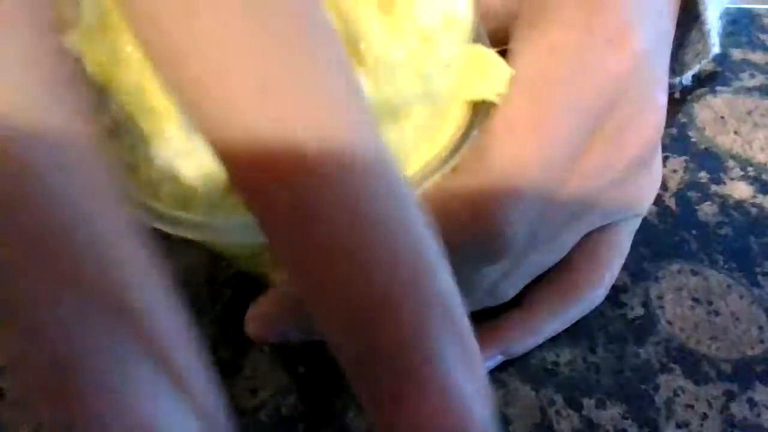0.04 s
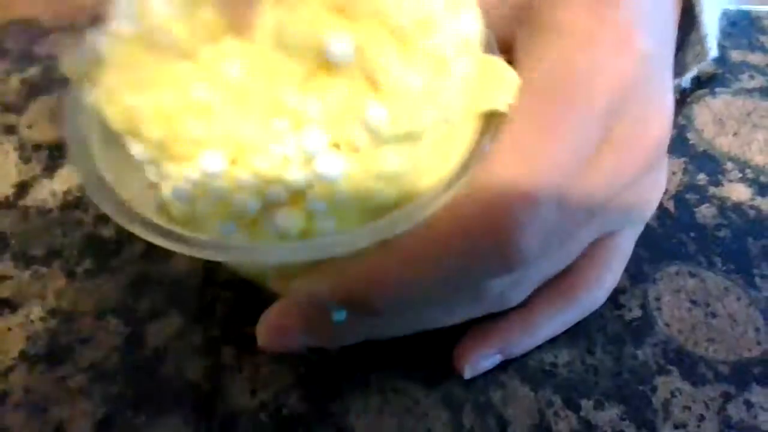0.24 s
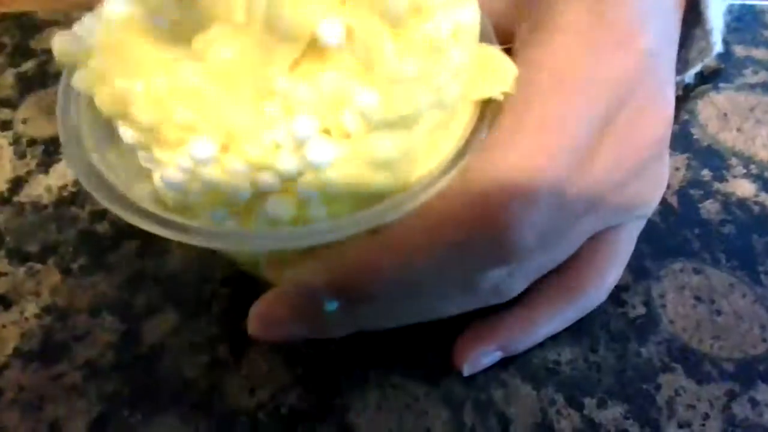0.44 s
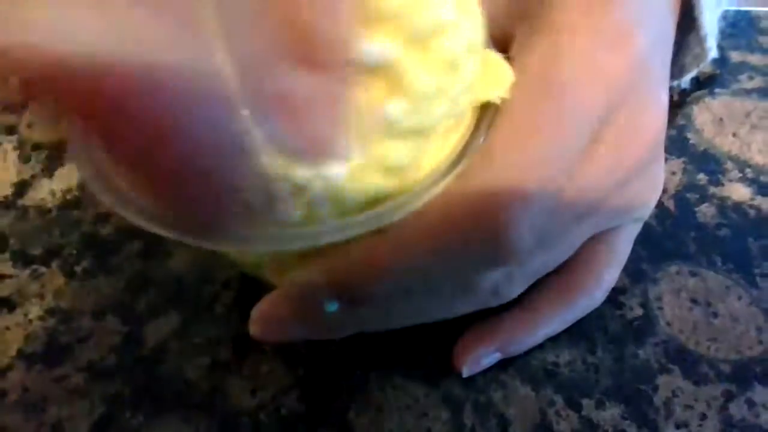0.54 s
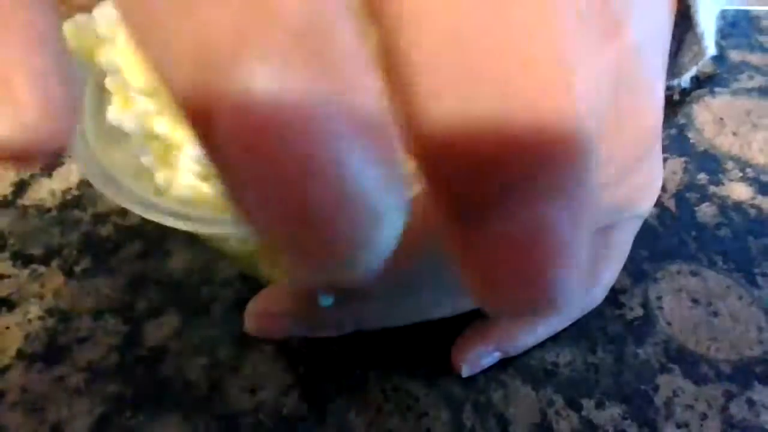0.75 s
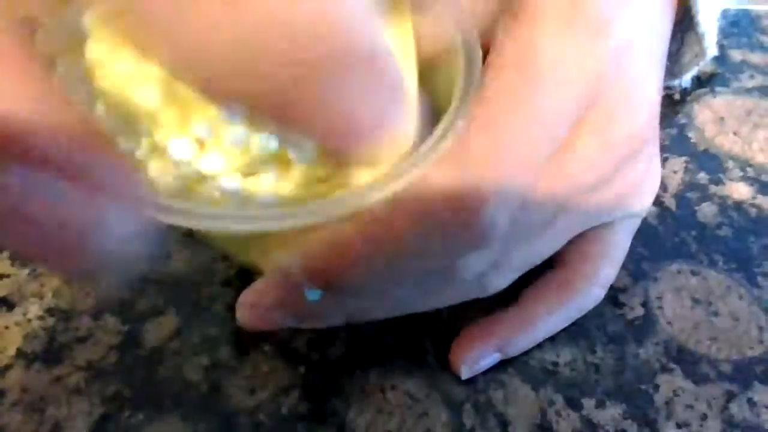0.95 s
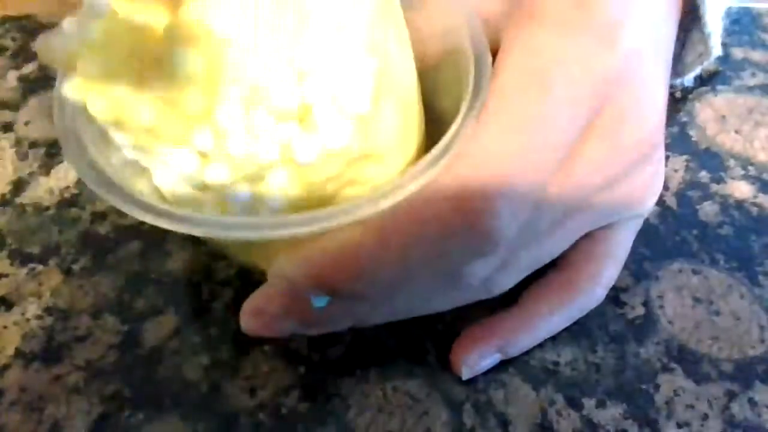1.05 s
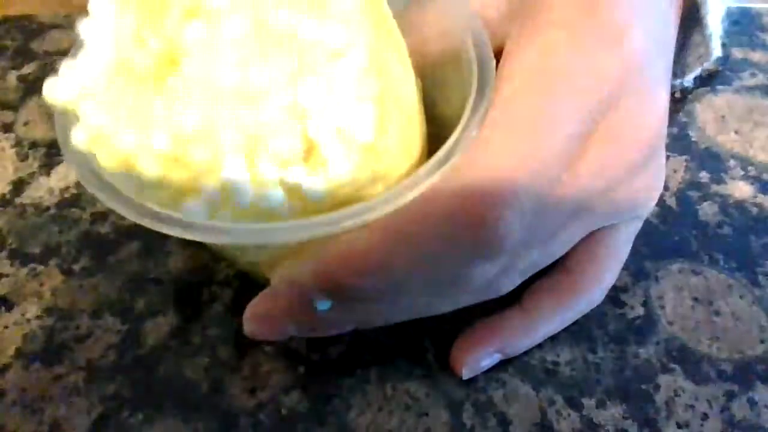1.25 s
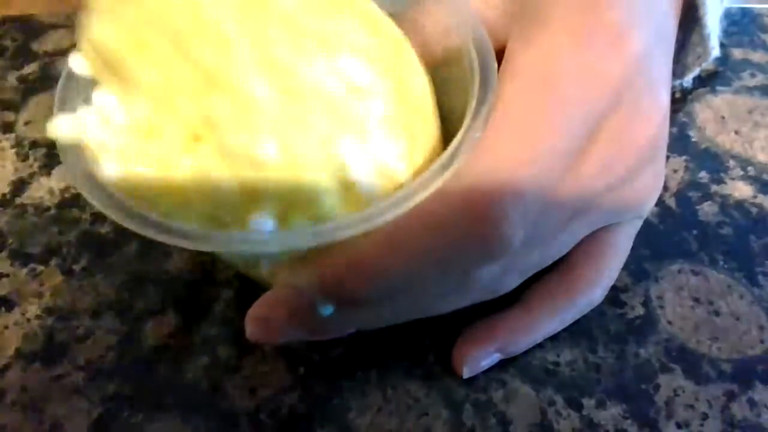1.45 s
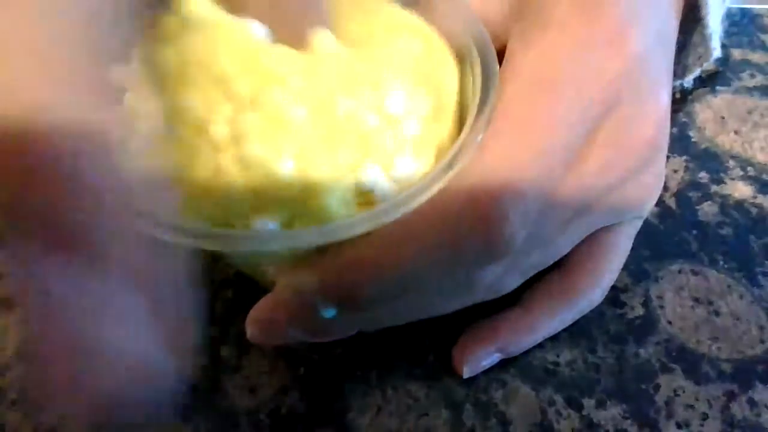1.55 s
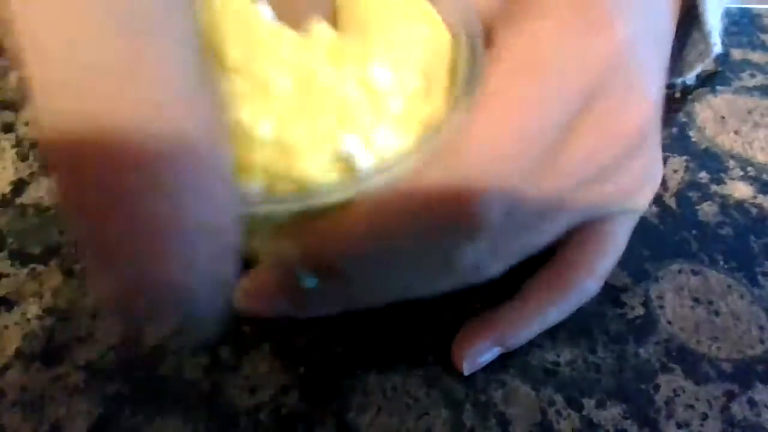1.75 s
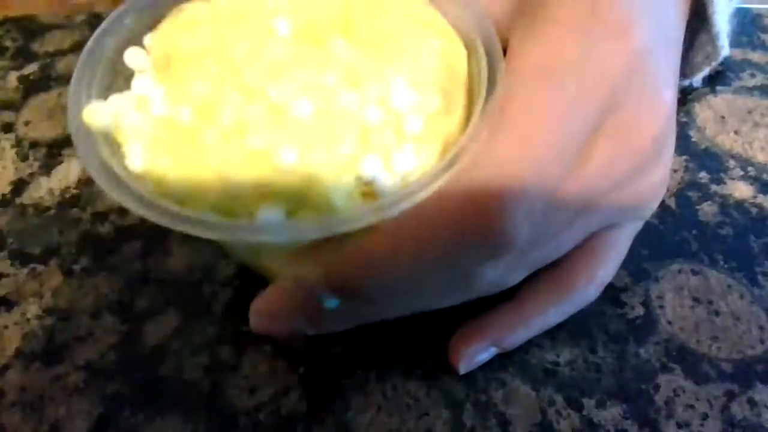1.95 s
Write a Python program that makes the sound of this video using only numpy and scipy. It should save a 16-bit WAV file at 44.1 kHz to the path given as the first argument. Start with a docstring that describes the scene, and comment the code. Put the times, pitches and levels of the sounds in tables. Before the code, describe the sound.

Beaded slime is kneaded in a plastic cup close to the microphone, giving sticky ticks, a soft fizz and small air pops. Early on a hand knocks the microphone loudly. The crackling continues, with a brief squelch, in a quiet room.

```python
"""Sticky ticks and a soft fizz come first: fingers knead bead-filled slime in a plastic cup, up close.
Each stroke rubs the beads and bursts tiny bubbles; films snap, air pockets pop, trapped air squelches.
About a quarter second in, a hand knocks the microphone and presses on its right opening, which overloads.
Behind it all is a quiet room with a low rumble, a faint hiss and a hum."""
import sys
import numpy as np
from scipy import signal
from scipy.fft import rfft, irfft, next_fast_len
from scipy.io import wavfile

SR = 44100
rng = np.random.default_rng(int(sys.argv[2]) if len(sys.argv) > 2 else 0)


def transcribe(u):
    """Save the signal u as a 16-bit wav file named by the first command-line argument.

    u: samples, shape (n,) or (channels, n), limited to [-1, 1]; the rate is SR.
    q: integer samples, one column per channel.
    """
    v = np.clip(np.atleast_2d(u).T, -1, 1)
    q = np.round(v * 32767).astype(np.int16)
    wavfile.write(sys.argv[1], SR, q)


N = 88200
T = np.arange(N) / SR

# finger strokes (loudest at [s], rise [s], fall [s], rub [dB], fizz [dB], sizzle [dB])
FINGER_STROKES = [(0.031, 0.022, 0.03, -51.5, -56, -59), (0.092, 0.027, .03, -50, -41, -47),
                  (0.206, .035, 0.056, -44, -42.5, -45.5), (.29, 0.037, 0.074, -62, -60, -65),
                  (0.432, 0.046, 0.035, -53, -51, -55), (0.557, 0.0032, 0.029, -63.5, -57.5, -47.5),
                  (0.673, 0.06, 0.072, -60, -54, -54.5), (.87, 0.059, 0.12, -61.5, -53.5, -54),
                  (1.004, 0.12, 0.065, -52.5, -52, -54), (1.178, 0.037, 0.021, -59, -56.5, -58),
                  (1.3, 0.069, 0.1, -61.5, -60, -53.5), (1.41, 0.02, 0.032, -54, -58.5, -50.5),
                  (1.49, 0.055, 0.076, -55, -55.5, -53.5), (1.61, 0.063, 0.1, -59, -61.5, -67),
                  (1.78, 0.035, .024, -44.5, -44, -43), (1.815, 0.021, 0.045, -57, -52.5, -52),
                  (2.0, 0.039, .03, -63, -58.5, -62.5)]
# sticky films snapping (time [s], click level [dB], ring level [dB], ring pitch [Hz])
FILM_SNAPS = [(0.0266, -23.5, -34.5, 8500), (0.0999, -19.5, -15, 7360), (0.5289, -31, -26.5, 14100),
              (0.5509, -29.5, -25, 10670), (0.5593, -35, -29, 11500), (0.6482, -30.5, -26, 6310),
              (0.6614, -25.5, -38, 9150), (0.6883, -30.5, -41, 13500), (0.713, -31, -48, 8350),
              (.7844, -42, -50, 6520), (0.9488, -30.5, -28, 14300), (.9596, -34, -32.5, 6230),
              (0.995, -29.5, -32.5, 7960), (1.0074, -33, -38, 6340), (1.2113, -35.5, -33.5, 7140),
              (1.3007, -45, -32, 11700), (1.3076, -40, -32, 13300), (1.3716, -32.5, -35, 6110),
              (1.4433, -33.5, -30, 13600), (1.4928, -38, -39, 6160), (1.5478, -45, -43, 12500),
              (1.6326, -32, -32, 10340), (1.774, -22, -27, 4600), (1.785, -27, -32.5, 5000)]
# air pockets opening (time [s], level [dB], pitch [Hz])
AIR_POCKETS = [(.216, -22.5, 1180), (.881, -32, 2810), (.9487, -21, 2520), (0.9594, -24, 2330),
               (0.9784, -42, 2400), (.995, -31, 3440), (1.0066, -30, 2680), (1.1223, -42, 1520),
               (1.2115, -28.5, 2985), (1.3228, -36, 1980), (1.3718, -37.5, 1700), (1.471, -38.5, 2190),
               (1.4927, -39.5, 990), (1.5835, -44, 2130), (1.5895, -40.5, 2440), (1.6045, -41, 1980),
               (1.658, -34.5, 2115), (1.755, -33, 3480), (1.7858, -26, 984)]
# air gulping through the slime (time [s], half length [s], pitch [Hz], level [dB])
AIR_GULPS = [(1.308, 0.0072, 451, -42), (1.401, 0.0034, 461, -31), (1.414, 0.0036, 485, -31.5),
             (1.433, 0.0048, 470, -48), (1.449, 0.012, 462, -45)]
# the squeak's overtones (multiple of its pitch, level [dB])
SQUEAK_OVERTONES = [(3, -51), (4, -50), (5, -58.5), (6, -59), (7, -59)]
# knocks on the microphone (time [s], thud level [dB], fade time [s], crack level [dB])
MIC_KNOCKS = [(0.2471, -16.5, 0.036, 4.5), (.2559, -12, 0.033, 9.5)]
# the notes its case rings at (pitch [Hz], level [dB], fade time [s])
CASE_NOTES = [(317, -18, 0.05), (524.3, -10.5, 0.063), (713, -15, 0.057), (876, -19.5, .045),
              (1086, -16.5, .042), (1405, -23.5, 0.053)]
# the hand shifting on the microphone (loudest at [s], rise [s], fall [s], level [dB])
HAND_SHIFTS = [(.225, 0.02, 0.019, -39.5), (0.389, 0.14, 0.093, -39), (.68, .05, 0.06, -46.5),
               (1.785, .02, 0.018, -49)]
# an appliance humming (pitch [Hz], level [dB])
HUM_TONES = [(60, -59.5), (441, -66.5)]

# tone colours: how strong each noise is from low to high (frequency [Hz], relative level [dB])
RUB_COLOUR = [(100, -1.5), (300, -9.5), (520, 5.5), (800, -9.5), (1200, -1.5), (1550, -4.5), (2050, 3),
              (2450, -6), (3400, 4.5), (4200, -21), (8000, -36)]  # beads rubbing in the hollow cup
FIZZ_COLOUR = [(1500, -27), (3500, -7), (5000, 0), (7500, -1), (10000, -5), (15000, -14)]  # tiny bubbles bursting
SIZZLE_COLOUR = [(5000, -19.5), (10000, -2), (15500, -5)]  # the very finest bubbles
SNAP_COLOUR = [(500, -30), (1500, -15.5), (3000, -6), (7000, 3.5), (15000, 2.5)]  # bright clicks and cracks
GURGLE_COLOUR = [(250, -10.5), (450, -2.5), (590, -4), (750, -11), (2500, -37)]  # escaping air
THUD_COLOUR = [(40, -7), (200, -12), (520, 2.5), (1100, -1.5), (2200, -4), (3300, -11), (4200, -24),
               (16000, -40)]  # dull knocks and slaps
SKIN_COLOUR = [(1000, -7), (4000, -14.5), (8500, -3), (11000, -3), (14000, -22.5)]  # skin scraping
CUP_COLOUR = [(600, -14), (1200, -1.5), (1550, -3), (2000, -0.5), (2600, -17), (5000, -30)]  # the jolted cup's hollow ring
RUMBLE_COLOUR = [(25, 5.5), (75, -3.5), (140, -16.5), (300, -30), (1200, -41), (4000, -74)]  # the shifting hand
ROOM_COLOUR = [(15, 4.5), (35, -0.5), (62, -6.5), (110, -16), (250, -18), (520, -23), (800, -34.5),
               (2000, -37), (5000, -42.5), (15000, -39.5)]  # the room's rumble and hiss

CONTACT_S = 0.2467  # when the hand meets the microphone


def amp(db):
    """Turn decibels into a number to multiply by."""
    return 10 ** (np.asarray(db) / 20)


def unit(x):
    """Scale x to an average power of 1."""
    return x / np.sqrt(np.mean(x ** 2) + 1e-20)


def filtered(x, response):
    """Turn each frequency in x up or down by response(hz)."""
    size = next_fast_len(N + 8192)
    return irfft(rfft(x, size) * response(np.fft.rfftfreq(size, 1 / SR)), size)[..., :N]


def coloured(x, colour):
    """Give x a tone colour and an average power of 1."""
    freqs, db = np.transpose(colour)
    return unit(filtered(x, lambda hz: amp(np.interp(np.log(hz + 1), np.log(freqs), db))))


def noise(side_db):
    """Stereo hiss; a higher side_db makes left and right less alike."""
    mid, side = rng.standard_normal((2, N))
    return unit(np.array([mid + amp(side_db) * side, mid - amp(side_db) * side]))


def panned(db):
    """Left and right gains that make the left louder by db."""
    return amp(np.array([[db], [-db]]) / 2)


def swell(s, rise, fall):
    """A smooth hill of loudness, highest at time s."""
    return np.exp(-((T - s) / np.where(T < s, rise, fall)) ** 2)


def decay(s, fade_s):
    """A sudden start at time s that fades by 60 dB in fade_s seconds."""
    return (T >= s) * np.exp(-np.log(1000) * np.maximum(T - s, 0) / fade_s)


def glide(s, hz, rise_per_s):
    """A climbing tone that passes through hz at time s."""
    return np.sin(2 * np.pi * hz * (T - s) * (1 + rise_per_s * (T - s) / 2))


def grains(per_s, spread_db):
    """The flickering loudness of many tiny bursts of uneven size."""
    happens = rng.random(N) < per_s / SR
    size = np.minimum(rng.exponential(size=N), 4)
    power = happens * amp(spread_db * size) ** 2
    fading_power = signal.lfilter([1], [1, -np.exp(-1 / (0.00049 * SR))], power)
    return unit(np.sqrt(fading_power))


def kneading():
    """Each stroke rubs the beads together; small bubbles fizz and the finest ones sizzle."""
    power = sum(np.outer(amp(levels), swell(s, rise, fall)) ** 2
                for s, rise, fall, *levels in FINGER_STROKES)
    rub_level, fizz_level, sizzle_level = np.sqrt(power)
    bubbles = grains(per_s=800, spread_db=4)
    beads = grains(per_s=500, spread_db=6)
    fizz = coloured(noise(side_db=-5) * (1 + bubbles), FIZZ_COLOUR)
    sizzle = coloured(noise(side_db=-8.5) * (0.85 + bubbles), SIZZLE_COLOUR)
    rub = coloured(noise(side_db=-8) * (1.07 + beads + 0.33 * bubbles), RUB_COLOUR)
    return fizz_level * fizz + sizzle_level * sizzle + rub_level * panned(-2) * rub


def film_ticks():
    """Thin films snap: a click, a faint wet tail and the climbing ring of the bubble behind."""
    splash = coloured(noise(side_db=-5.5), SNAP_COLOUR)
    out = np.zeros((2, N))
    for s, click_db, ring_db, hz in FILM_SNAPS:
        start = s + 0.0011
        click = amp(click_db) * (decay(start, 0.0027) + amp(-10) * decay(start, 0.021)) * splash
        ring = amp(ring_db) * decay(start, 0.0057) * glide(start, hz, rise_per_s=36)
        out += panned(rng.normal(0, 3)) * (click + ring)
    return out


def pocket_pops():
    """Larger air pockets open with a short, hollow ring, a splash and a faint wet tail."""
    splash = noise(side_db=-8)
    out = np.zeros((2, N))
    for s, db, hz in AIR_POCKETS:
        ring = amp(-7) * np.sin(2 * np.pi * hz * (T - s))
        burst = decay(s + 0.001, fade_s=0.0053) * (ring + splash)
        wet_tail = amp(-16) * decay(s + 0.0017, fade_s=0.022) * splash
        out += amp(db) * (burst + wet_tail)
    pocket_band = signal.butter(3, [962, 4020], "band", fs=SR, output="sos")
    return signal.sosfilt(pocket_band, out)


def squelch():
    """Trapped air gurgles out in rising blips while the gap squeaks at a falling pitch."""
    gulps = sum(amp(db) * swell(s, half, half) * glide(s, hz, rise_per_s=18)
                for s, half, hz, db in AIR_GULPS)
    second_gulp_s = AIR_GULPS[1][0]
    gurgle_level = amp(-51) * swell(second_gulp_s, rise=0.0055, fall=0.07)
    gurgle = gurgle_level * coloured(noise(side_db=-13), GURGLE_COLOUR)
    squeak_s, squeak_hz, drop_hz_per_s = 1.412, 504, 3200
    t = T - squeak_s
    phase = 2 * np.pi * (squeak_hz * t - drop_hz_per_s * t * t / 2)
    squeak = sum(amp(db) * np.sin(k * phase + rng.uniform(0, 2 * np.pi)) for k, db in SQUEAK_OVERTONES)
    return gulps + gurgle + swell(squeak_s, rise=0.014, fall=0.014) * squeak


def finger_plunge():
    """A finger sinks deep into the slime with a dull, lumpy slap."""
    lumps = noise(side_db=-9) * grains(per_s=500, spread_db=3.5)
    return amp(-42.5) * swell(1.787, rise=0.014, fall=0.0085) * coloured(lumps, THUD_COLOUR)


def mic_knocks():
    """The hand hits the microphone, rings its case and scrapes off; the covered right gets less thud."""
    thud = coloured(noise(side_db=-4.5), THUD_COLOUR)
    crack = coloured(noise(side_db=-8.5), SNAP_COLOUR)
    out = panned(3) * sum(amp(db) * decay(CONTACT_S, fade_s) * np.sin(2 * np.pi * hz * (T - CONTACT_S))
                          for hz, db, fade_s in CASE_NOTES)
    for s, thud_db, fade_s, crack_db in MIC_KNOCKS:
        out += amp(thud_db) * panned(6.5) * decay(s, fade_s) * thud
        out += amp(crack_db) * decay(s, fade_s=0.0016) * crack
    skin = coloured(noise(side_db=-4.5), SKIN_COLOUR)
    touch = amp(-25.5) * swell(CONTACT_S, rise=0.0032, fall=0.0027)
    scrape = amp(-18.5) * swell(0.2605, rise=0.0043, fall=0.0043)
    return out + (touch + scrape) * skin * panned(-3.5)


def hand_pressure():
    """The hand seals the microphone's right opening: a push of air, then a slow rebound as it lifts."""
    hold_s, release_s = 0.0164, 0.0053
    push = (T >= CONTACT_S) * np.exp(-np.maximum(T - CONTACT_S - hold_s, 0) / release_s)
    lift_s, rise_s, fall_s = 0.2795, 0.021, 0.048
    t = np.maximum(T - lift_s, 0)
    rebound = amp(4) * (1 - np.exp(-t / rise_s)) * np.exp(-t / fall_s)
    return np.array([np.zeros(N), rebound - push])


def air_chirp():
    """Air squeezed from under the hand makes a quick falling chirp, louder on the open left side."""
    t = np.maximum(T - CONTACT_S, 0)
    pitch_hz = 350 + 3500 * np.exp(-t / 0.0025)
    phase = 2 * np.pi * np.cumsum((T >= CONTACT_S) * pitch_hz) / SR
    return amp(-6.5) * panned(3.4) * decay(CONTACT_S, fade_s=0.016) * np.sin(phase)


def cup_ring():
    """The jolted cup rings on faintly after the knock."""
    return amp(-46.5) * decay(CONTACT_S, fade_s=0.47) * coloured(noise(side_db=-3), CUP_COLOUR)


def hand_rumble():
    """A soft, low rumble whenever the hand shifts against the microphone."""
    level = sum(amp(db) * swell(s, rise, fall) for s, rise, fall, db in HAND_SHIFTS)
    return level * coloured(noise(side_db=-8), RUMBLE_COLOUR)


def with_echo(x):
    """Add a short, faint echo from the counter and walls."""
    tail = rng.standard_normal((2, N)) * decay(0.0027, fade_s=0.122)
    echo = signal.fftconvolve(x, tail / np.linalg.norm(tail[0]), axes=1)[:, :N]
    return x + amp(-17) * echo


def room_tone():
    """The quiet room: low rumble, faint hiss and a humming appliance."""
    hum = sum(amp(db) * np.sin(2 * np.pi * hz * T + rng.uniform(0, 2 * np.pi)) for hz, db in HUM_TONES)
    return amp(-50.5) * coloured(noise(side_db=-10), ROOM_COLOUR) + hum


def scene():
    """Mix the slime and its echo, the hand's bump and the background."""
    slime = with_echo(kneading() + film_ticks() + pocket_pops() + squelch() + finger_plunge())
    bump = mic_knocks() + hand_pressure() + air_chirp() + cup_ring()
    return slime + bump + hand_rumble() + room_tone()


def record(dry):
    """The recorder flattens peaks that are too loud and cuts off the highest treble."""
    top_hz = 16000
    return filtered(np.clip(dry, -1, 1), lambda hz: 1 / (1 + (hz / top_hz) ** 120))


dry = scene()
out = record(dry)
transcribe(out)
```